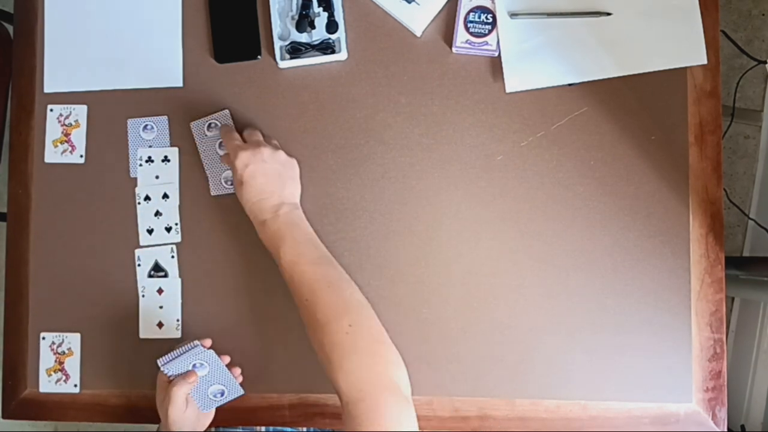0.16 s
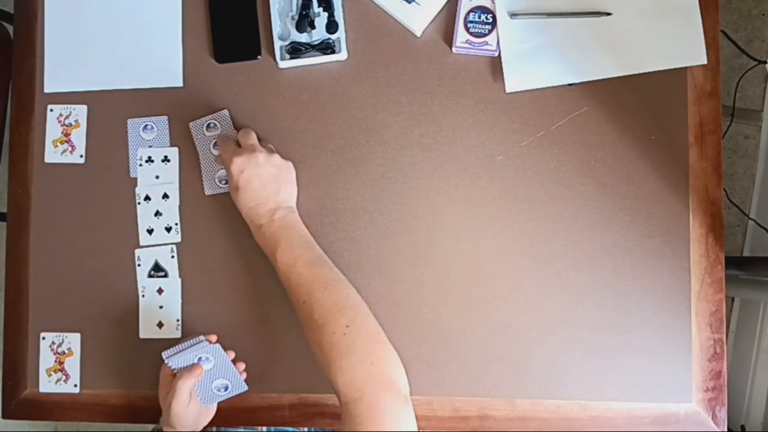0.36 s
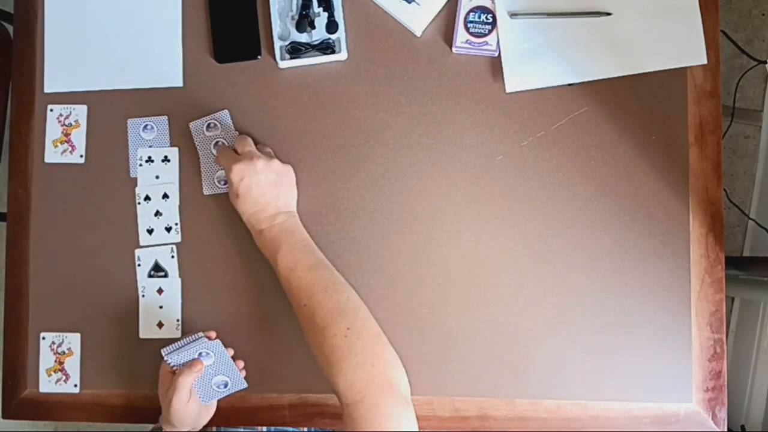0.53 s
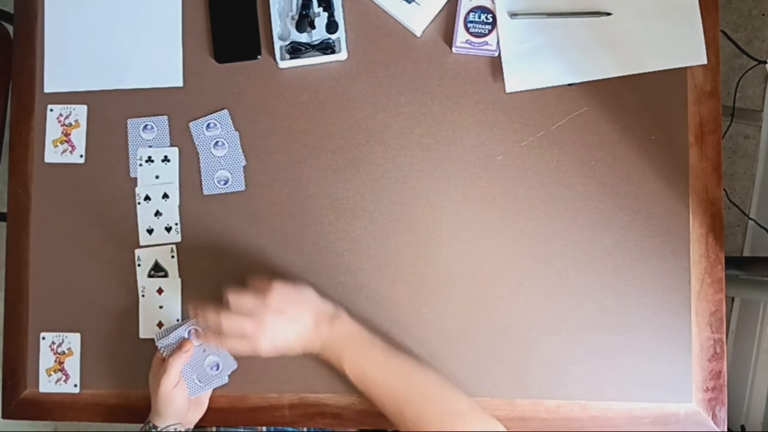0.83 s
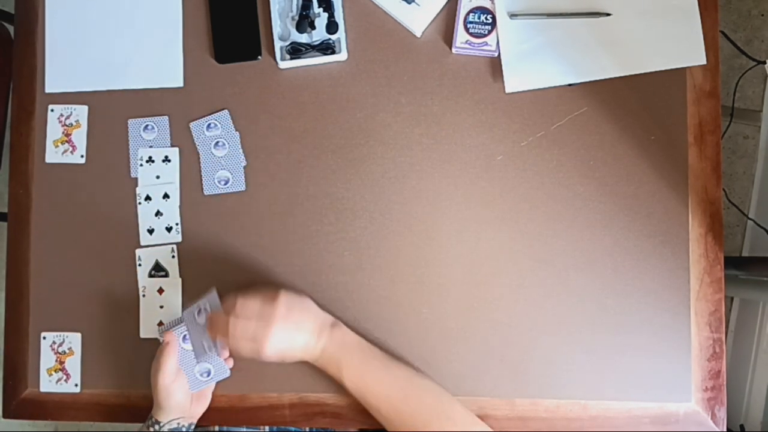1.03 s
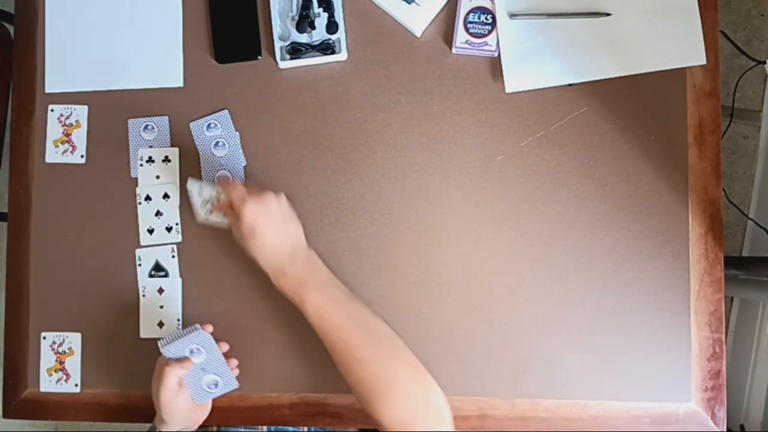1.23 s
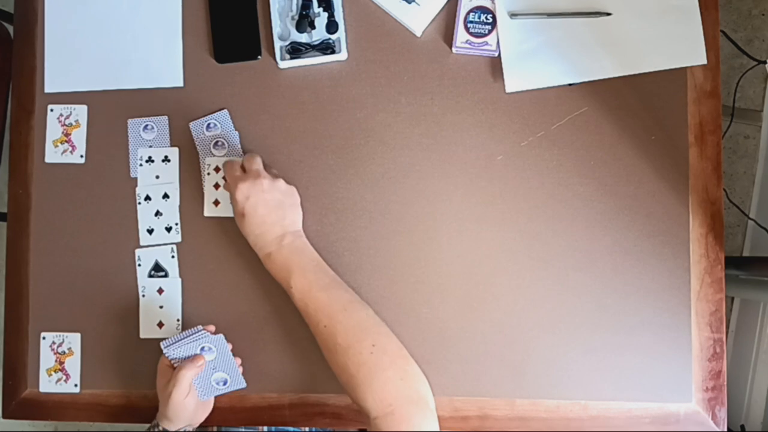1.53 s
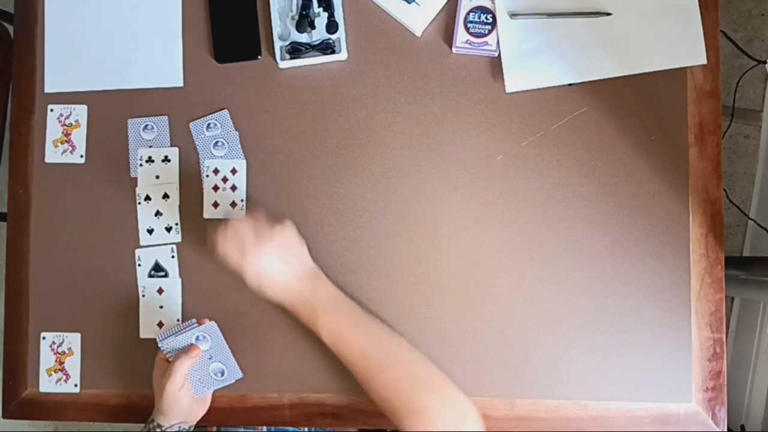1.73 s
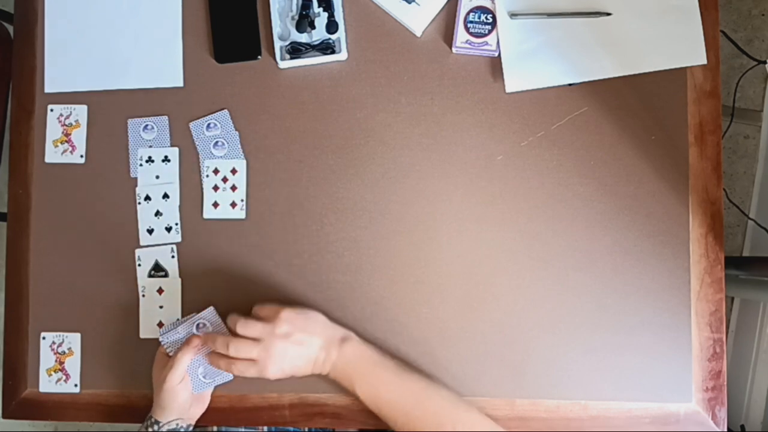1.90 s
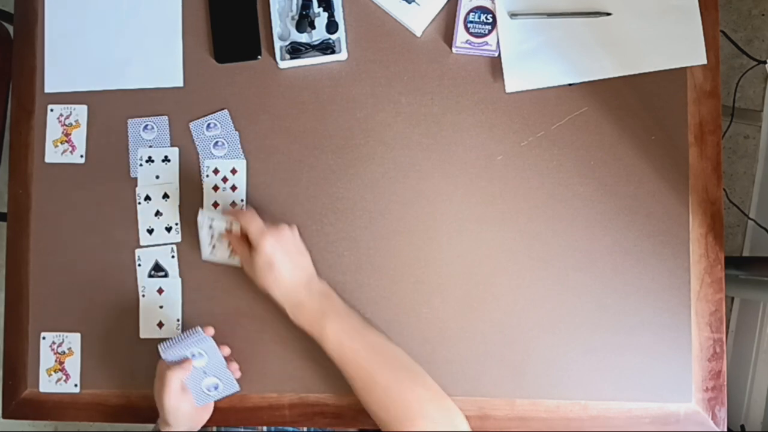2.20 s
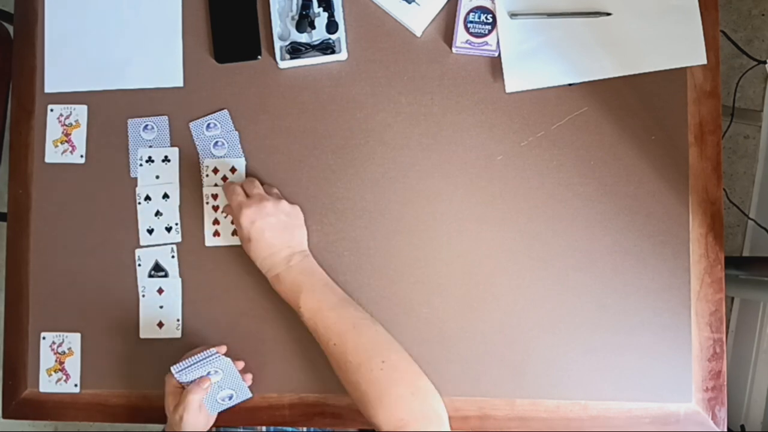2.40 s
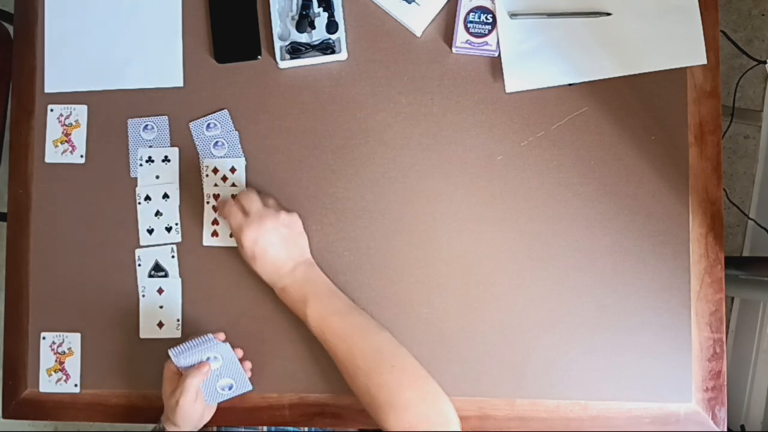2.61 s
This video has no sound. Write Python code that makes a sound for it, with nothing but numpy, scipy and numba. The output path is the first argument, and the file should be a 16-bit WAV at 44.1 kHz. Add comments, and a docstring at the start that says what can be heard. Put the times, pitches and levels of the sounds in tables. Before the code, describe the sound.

Playing cards snapped down one by one onto a hard tabletop in a small quiet room

```python
"""Playing cards are dealt onto a table in a small room, heard by a microphone above it.
Edge ticks and a rub lead to the first snap: a bent card springs off the thumb, cracks and slaps the table.
Then a swish of noise climbs as a card slides off the pack, with dull hand knocks, rubs and a second snap.
Faint fingertip squeaks follow, then more knocks and rubs, a third snap and a last fading rub.
Table modes and diffuse reflections ring after contacts; filtered noise makes arm rumble and room air."""
import sys
import numpy as np
from scipy import signal
from scipy.fft import rfft, irfft
from scipy.io import wavfile
from scipy.ndimage import uniform_filter1d
from numba import njit

SR = 44100
rng = np.random.default_rng(int(sys.argv[2]) if len(sys.argv) > 2 else 0)


def transcribe(signal):
    """Save signal, clipped to [-1, 1], as a 16-bit WAV file at the path in sys.argv[1]."""
    frames = np.atleast_2d(signal).T
    limited = np.clip(frames, -1, 1)
    pcm = np.round(limited * 32767).astype(np.int16)
    wavfile.write(sys.argv[1], SR, pcm)


N = 121275


def undb(db):
    """Turn dB into an amplitude factor."""
    return 10 ** (np.asarray(db) / 20)


def times():
    """Time of every sample in seconds."""
    return np.arange(N) / SR


def unit(x):
    """Scale to rms 1."""
    return x / np.sqrt(np.mean(x ** 2) + 1e-30)


def blow(x, db):
    """Give a short sound the energy of 5 ms at this rms level."""
    energy = np.sum(x ** 2) + 1e-30
    return x * undb(db) * np.sqrt(0.005 * SR / energy)


def noise():
    """White noise as long as the scene."""
    return rng.standard_normal(N)


def delay(x, seconds):
    """Start a sound this many seconds later."""
    silence = np.zeros(max(int(seconds * SR), 0))
    return np.concatenate([silence, x])[:N]


def colour(x, points, tilt_db=0):
    """Minimum-phase filter through (Hz, dB) points, tilted in dB per octave."""
    size = 8192
    octave = np.log2(np.maximum(np.fft.rfftfreq(size, 1 / SR), 1))
    hz, db = np.array(points, float).T
    curve_db = np.interp(octave, np.log2(hz), db)
    curve_db = curve_db + tilt_db * np.maximum(octave, np.log2(hz[0]))
    # Folding the cepstrum forward in time makes the filter causal
    cepstrum = irfft(np.log(undb(curve_db)))
    cepstrum[1:size // 2] *= 2
    cepstrum[size // 2 + 1:] = 0
    return signal.fftconvolve(x, irfft(np.exp(rfft(cepstrum))))[:N]


@njit
def moving_bandpass(x, hz, share):
    """State-variable band-pass with a moving centre; width as a share of the centre."""
    y, band_state, low_state = np.empty(len(x)), 0., 0.
    for i in range(len(x)):
        g = np.tan(np.pi * hz[i] / SR)
        v = (band_state + g * (x[i] - low_state)) / (1 + g * (g + share))
        band_state = 2 * v - band_state
        low_state = low_state + 2 * g * v
        y[i] = share * v
    return y


def band(x, hz, share):
    """Steep resonance: the band-pass twice."""
    hz = hz * np.ones(N)
    once = moving_bandpass(x, hz, float(share))
    return moving_bandpass(once, hz, float(share))


def walk(rate):
    """Smooth random wander with spread 1, averaged over 1 / rate seconds."""
    return unit(uniform_filter1d(noise(), int(SR / rate)))


def burst(decay_s, chatter_db):
    """A contact: a clean push, then dying chatter at a level in dB against the push."""
    chatter = noise() * np.exp(-times() / decay_s)
    x = chatter * undb(chatter_db) / np.sqrt(np.sum(chatter ** 2))
    x[0] = 1
    return x


def ring(modes):
    """Struck modes: decaying sines, each with its own pitch, level and t60."""
    t = times()
    return sum(blow(np.sin(2 * np.pi * hz * t) * undb(-60 * t / t60), db) for hz, db, t60 in modes)


# Spectrum of the air in the room. Each row: frequency in Hz, relative level in dB.
AIR_COLOUR = [(35, -58), (60, -11.5), (217, -8), (244, -12.5), (315, -5.5), (469, -12), (515, -11),
              (1310, -21), (1700, -22.5), (2840, -32.5), (16000, -42.5)]
AIR_DB = -69.5


def air():
    """Quiet room air around the table: steady coloured noise."""
    return undb(AIR_DB) * unit(colour(noise(), AIR_COLOUR))


# Reverberation of the small room. Each row: frequency in Hz, time to fall 60 dB in s.
REVERB_TIMES = [(100, .38), (500, .35), (1500, .32), (2800, 0.32), (5600, 0.31), (9000, .25), (12000, 0.19),
                (16000, .19)]
# Spectrum of the reflections. Each row: frequency in Hz, relative level in dB.
ROOM_COLOUR = [(40, 2), (150, -5), (280, -3), (700, -5.5), (1500, -4), (2200, -6), (3200, -9), (4200, -1.5),
               (5200, 1), (6400, -10.5), (9000, -5), (16000, -8)]
# The delay is that of a path about 1.2 m longer than the direct one
ROOM_DB, ROOM_DELAY_S, ROOM_BUILD_S = -10, 0.0036, 0.0013


def room(x):
    """Diffuse reflections of a small room; the treble dies first."""
    hz, t60 = np.array(REVERB_TIMES).T
    f, t, cells = signal.stft(noise(), SR, nperseg=256)
    fade = np.exp(-np.log(1000) * t / np.interp(f, hz, t60)[:, None])
    tail = signal.istft(cells * fade, SR)[1][:N]
    tail = tail * (1 - np.exp(-times() / ROOM_BUILD_S))
    tail = delay(colour(tail, ROOM_COLOUR), ROOM_DELAY_S)
    tail = tail / np.sqrt(np.sum(tail ** 2))
    return signal.fftconvolve(x, tail)[:N] * undb(ROOM_DB)


# Strength of the rumble as the arm moves. Each row: time in seconds, level in dB.
RUMBLE_LEVELS = [(0, -61), (.19, -48), (0.309, -54), (.55, -57), (0.658, -62), (.75, -50), (1.148, -59.5),
                 (1.2, -43.5), (1.36, -40), (1.5, -49), (1.85, -61), (2.252, -61), (2.274, -39),
                 (2.37, -31.5), (2.42, -55.5), (2.64, -40.5), (2.75, -55)]
# Spectrum of the rumble. Each row: frequency in Hz, relative level in dB.
RUMBLE_COLOUR = [(10, -17.5), (28, -5.5), (38, 4.5), (50, -15.5), (80, -18), (130, -22.5), (250, -35),
                 (1000, -70.5), (16000, -100)]
RUMBLE_EVEN_S = 0.035  # its strength is evened over this time


def rumble():
    """The table's low rumble follows the arm: evened low noise under a moving level."""
    s, db = np.array(RUMBLE_LEVELS).T
    low = unit(colour(noise(), RUMBLE_COLOUR))
    power = uniform_filter1d(low ** 2, int(RUMBLE_EVEN_S * SR))
    low = low / np.sqrt(power + 0.01)
    return low * undb(np.interp(times(), s, db))


# Faint fingertip squeaks.
# Each row: centre in seconds, swell and fade time in s, pitch in Hz, level in dB.
FINGER_SQUEAKS = [(0.98, 0.018, 6240, -62), (1.981, 0.015, 1290, -69.5), (2.0, 0.029, 5820, -77.5),
                  (2.067, 0.019, 6245, -68.5), (2.078, 0.039, 3240, -77)]
SQUEAK_WIDTH = 0.098  # share of the pitch


def squeaks():
    """A fingertip slips on the card's coating with a narrow whisper."""
    t, out = times(), 0
    for s, length, hz, db in FINGER_SQUEAKS:
        whisper = unit(band(noise(), hz, SQUEAK_WIDTH))
        out = out + whisper * np.exp(-((t - s) / length) ** 2) * undb(db)
    return out


# Soft bumps of the hand.
# Each row: start in seconds, level in dB before softening, pitch in Hz, chatter decay in s.
HAND_BUMPS = [(.731, -47, 148.8, 0.038), (1.268, -45.5, 520, .015), (2.268, -28.5, 244, 0.027),
              (2.278, -19.5, 244, 0.013), (2.293, -21, 226, 0.011), (2.305, -25, 142, 0.012),
              (2.33, -29.5, 240, 0.017)]
# Softness of the hand. Each row: frequency in Hz, gain in dB.
HAND_SOFTNESS = [(60, 4.5), (520, -3), (750, -17), (1500, -52)]
BUMP_CHATTER_DB = 1


def bumps():
    """The hand meets the table with dull knocks: broad resonances, their treble softened."""
    out = 0
    for s, db, hz, decay in HAND_BUMPS:
        knock = band(burst(decay, BUMP_CHATTER_DB), hz, 1.0)
        out = out + delay(blow(knock, db), s)
    return colour(out, HAND_SOFTNESS)


# Path of a card off the pack. Each row: time in seconds, resonance in Hz, level in dB.
SLIDE_PATH = [(0.713, 480, -86.5), (.74, 520, -56), (.81, 530, -51.5), (0.841, 640, -53), (.93, 695, -60.5),
              (.98, 820, -52), (1.04, 910, -89), (1.11, 1050, -96), (1.18, 990, -68), (1.23, 920, -50.5),
              (1.28, 897, -51), (1.35, 850, -90)]
# Widths are shares of the centre; the upper band and hiss are in dB against the swish
SLIDE_WIDTH, UPPER_HZ, UPPER_DB, SLIDE_HISS_DB = 0.31, 1430, -15.5, -26.5


def slide():
    """A soft swish whose resonance climbs, then sinks a little, under a steady upper one."""
    t, (s, hz, db) = times(), np.array(SLIDE_PATH).T
    swish = unit(band(noise(), np.interp(t, s, hz), SLIDE_WIDTH))
    upper = undb(UPPER_DB) * unit(band(noise(), UPPER_HZ, 0.34))
    hiss = undb(SLIDE_HISS_DB) * unit(band(noise(), 3540, 3.1))
    return (swish + upper + hiss) * np.interp(t, s, undb(db), left=0, right=0)


# Cards rubbing.
# Each row: start and end in seconds, mid level in dB, swell in dB, treble tilt in dB per octave.
CARD_RUBS = [(0.075, 0.142, -63.5, -3, -5), (0.133, 0.219, -54, 8.5, -3), (0.959, 1.064, -62, -11, -3),
             (1.23, 1.313, -63.5, 17.5, -4.5), (1.32, 1.41, -44.5, -5, -0.5),
             (1.383, 1.445, -44.5, 17.5, -4), (2.178, 2.249, -73.5, -3.5, -4.5), (2.259, 2.346, -51, 5, -2),
             (2.326, 2.396, -50, -7, .5), (2.389, 2.471, -52.5, 0, -2), (2.542, 2.747, -60, -17, -4)]
# Spectrum of card on card, also in ticks and slips. Each row: frequency in Hz, relative level in dB.
RUB_COLOUR = [(200, -17), (1100, -9), (1650, -0.5), (2200, -7.5), (2750, 2.5), (3400, 3.5), (4250, -3),
              (5000, -21), (6400, -0.5), (7200, -5.5), (7900, -19.5), (8900, -2.5), (10300, -25),
              (13500, -18), (16000, -27.5)]
RUB_GRAIN_DB, RUB_FLUTTER_DB, RUB_EDGE_S = 3.5, 2.0, 0.016
RUB_SPLIT_HZ = 5500  # above and below it the rubbing flutters apart


def rubs():
    """Card on card: a dense, uneven stream of tiny catches."""
    t, out = times(), 0
    splitter = signal.butter(2, RUB_SPLIT_HZ, fs=SR, output="sos")
    for start, end, db, swell_db, tilt in CARD_RUBS:
        grain = noise() * undb(RUB_GRAIN_DB * walk(2000))
        low = signal.sosfiltfilt(splitter, grain)
        high = grain - low
        grain = low * undb(RUB_FLUTTER_DB * walk(70)) + high * undb(RUB_FLUTTER_DB * walk(70))
        gate = np.clip(np.minimum(t - start, end - t) / RUB_EDGE_S + 0.5, 0, 1)
        swell = swell_db * (np.clip((t - start) / (end - start), 0, 1) - 0.5)
        out = out + unit(colour(grain, RUB_COLOUR, tilt)) * gate * undb(db + swell)
    return out


CONTACT_CHATTER_DB = 15


def contacts(rows, spectrum):
    """Short papery impacts: a push and its chatter, coloured and tilted."""
    out = 0
    for s, db, tilt, decay in rows:
        impact = colour(burst(decay, CONTACT_CHATTER_DB), spectrum, tilt)
        out = out + delay(blow(impact, db), s)
    return out


# Light ticks of card edges.
# Each row: start in seconds, level in dB, treble tilt in dB per octave, chatter decay in s.
EDGE_TICKS = [(.065, -55.5, -6.5, .008), (.96, -53.5, -11, .01), (1.269, -39.5, -6, 0.017),
              (1.428, -32.5, 0, 0.0059), (1.433, -31, 2, 0.0074), (1.959, -75.5, 6, .004),
              (2.2563, -46.5, -.5, 0.0025), (2.349, -46.5, 1, .002)]


def ticks():
    """Card edges touch lightly, with the spectrum of rubbing."""
    return contacts(EDGE_TICKS, RUB_COLOUR)


# The freed card lands flat.
# Each row: start in seconds, level in dB, treble tilt in dB per octave, chatter decay in s.
CARD_SLAPS = [(.2226, -16.5, 2.06, 0.0022), (1.4665, -18, -1, 0.0042), (2.4590, -20, -1.5, 0.011)]
# Spectrum of the slap. Each row: frequency in Hz, relative level in dB.
SLAP_COLOUR = [(60, -13), (250, 5), (550, -2), (750, -3.5), (1400, 3), (2200, -5.5), (3000, -5.5),
               (4200, -5.5), (5200, -7), (6700, -4), (8000, -13.5), (9000, -9.5), (10500, -19.5),
               (16000, -21)]


def slaps():
    """The freed card slaps flat on the table with a broad papery impact."""
    return contacts(CARD_SLAPS, SLAP_COLOUR)


# Snaps off the thumb. Each row: start in seconds, overall level in dB, pitch of the bend in Hz,
# then the bend, edge crack, table thud and table ring in dB against that level.
CARD_SNAPS = [(0.2157, -12, 3280, 0.5, -1, -12, -5.5), (1.4614, -22, 2866, 5, -6.5, -4.5, -12),
              (2.4546, -15.5, 3700, -17, 1, -10.5, -3)]
# Modes of a card. Each row: frequency in Hz, relative level in dB, t60 in s.
CARD_MODES = [(522.7, -15, 0.021), (930, -18.5, 0.042), (1370, -20.5, 0.01631), (1770, -10.5, 0.013),
              (2736, -7, 0.013), (4057, -0.5, 0.015), (4280, -11.5, 0.012)]
# Long rings of the table and things on it. Each row: frequency in Hz, relative level in dB, t60 in s.
TABLE_MODES = [(142.5, -22, .25), (211, -19.5, .3), (230.1, -16.5, 0.47), (268, -13.5, 0.44),
               (294, -14.5, 0.12), (344, -16, 0.16), (405, -20, .18), (567, -17, 0.19), (614, -30, .6),
               (840, -28.5, 0.9), (1254, -25.5, 0.62), (1840, -25, 0.22), (2414, -27, .3),
               (3902, -17.5, .2), (4090, -18, .24), (4220, -21, 0.23)]
# Spectrum of the edge crack. Each row: frequency in Hz, relative level in dB.
CRACK_COLOUR = [(300, -27), (2200, -22), (3400, 7.5), (5200, -17.5), (6400, 6), (7100, -5), (8000, -25),
                (9000, -8.5), (10500, -29), (13000, -24), (16000, -31)]
# Spectrum of the table thud. Each row: frequency in Hz, relative level in dB.
THUD_COLOUR = [(25, -3.5), (100, -3), (230, -6.5), (480, 1.5), (700, -16.5), (2000, -10.5), (16000, -74)]
BEND_T60_S, CRACK_S, THUD_S, TABLE_RISE_S = 0.012, 0.0023, 0.0057, 0.0025
CRACK_CHATTER_DB, THUD_CHATTER_DB = -2, -5
SLIP_S, SLIP_DB = 0.0035, -10.5  # the corner scrapes over the thumb just before it lets go


def snaps():
    """The bent card scrapes off the thumb, springs straight with a crack and jolts the table."""
    t, out = times(), 0
    for s, db, hz, bend_db, crack_db, thud_db, ring_db in CARD_SNAPS:
        card = ring([(hz, bend_db, BEND_T60_S)]) + ring(CARD_MODES)
        card = card * (1 - np.exp(-t / 0.0004))
        crack = blow(colour(burst(CRACK_S, CRACK_CHATTER_DB), CRACK_COLOUR), crack_db)
        thud = blow(colour(burst(THUD_S, THUD_CHATTER_DB), THUD_COLOUR), thud_db)
        slip = blow(colour(noise() * t * (t < SLIP_S), RUB_COLOUR, -1.7), SLIP_DB)
        table = undb(ring_db) * ring(TABLE_MODES) * (1 - np.exp(-t / TABLE_RISE_S))
        snap = delay(card + thud + table, s) + delay(crack, s + 0.0004) + delay(slip, s - SLIP_S)
        out = out + undb(db) * snap
    return out


def scene():
    """Cards and hand, direct and by way of the room, over rumble and air."""
    cards = snaps() + slaps() + ticks() + rubs() + squeaks() + slide()
    hand = bumps()
    reflections = room(cards + undb(-4.5) * hand)
    return (cards + hand + reflections + (rumble() + air()))[None]


def record(dry):
    """Full scale caps the peaks, then a steep low-pass cuts the top above 16 kHz."""
    top_cut = signal.ellip(10, 0.2, 90, 16000, fs=SR, output="sos")
    return signal.sosfilt(top_cut, np.clip(dry, -1, 1))


dry = scene()
out = record(dry)
transcribe(out)
```